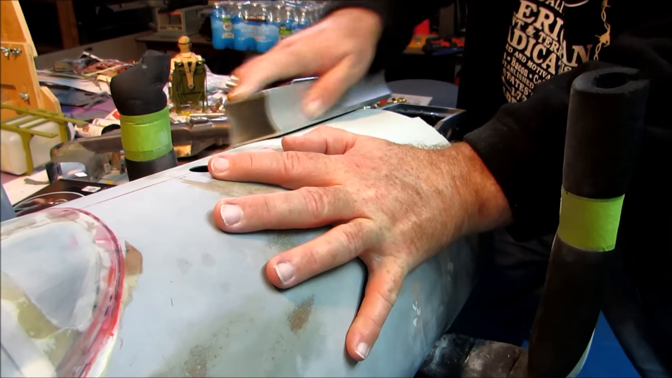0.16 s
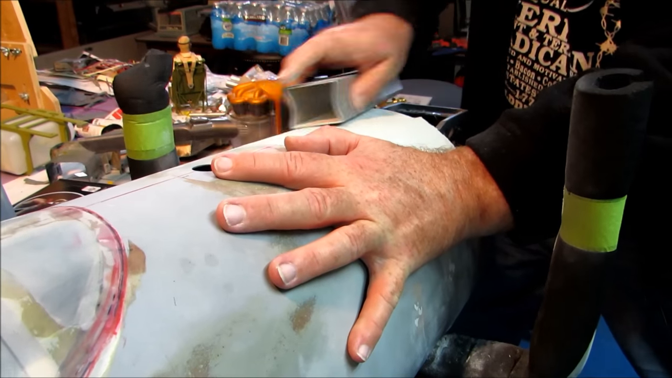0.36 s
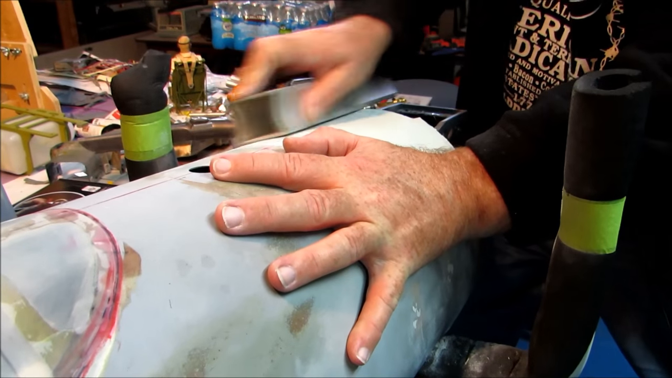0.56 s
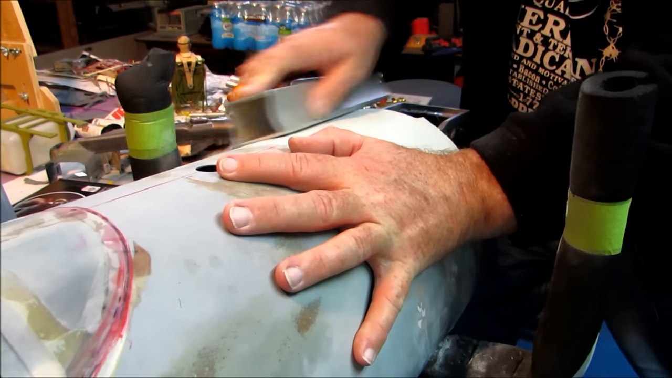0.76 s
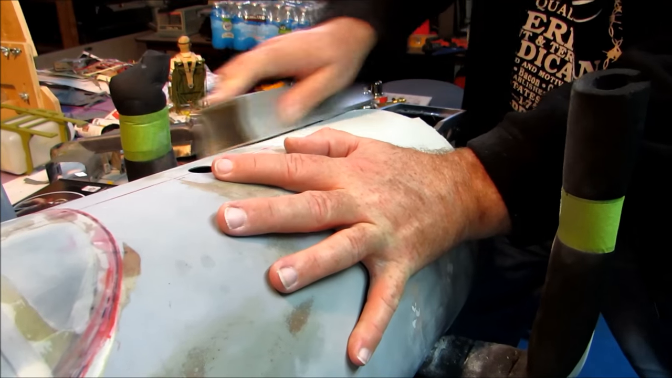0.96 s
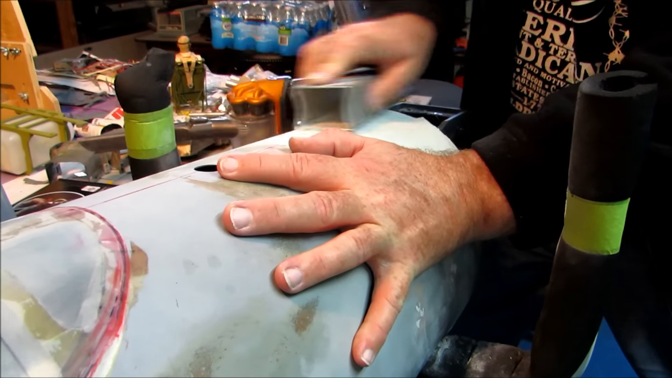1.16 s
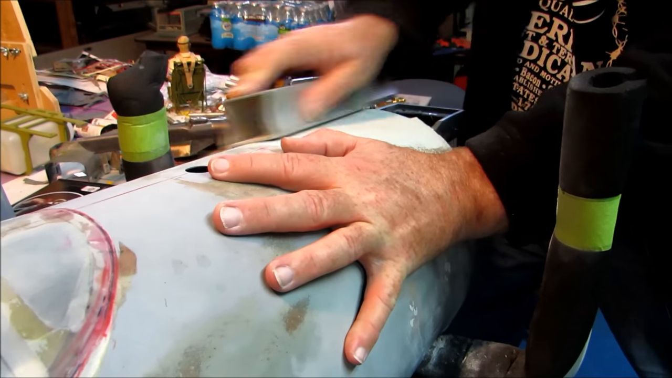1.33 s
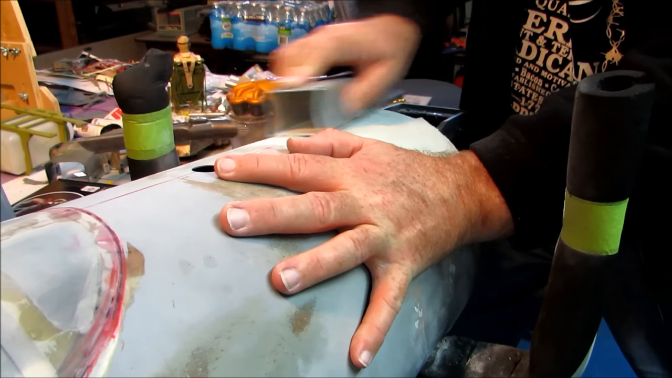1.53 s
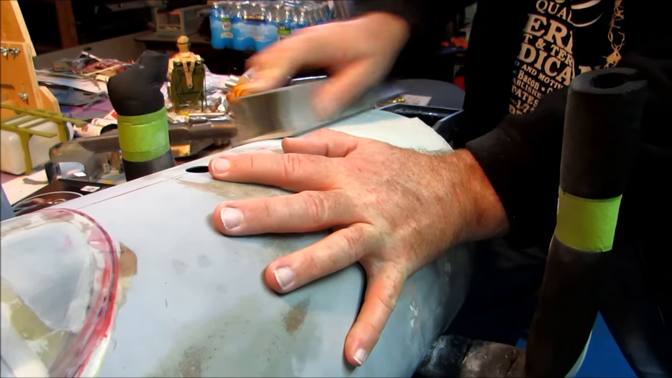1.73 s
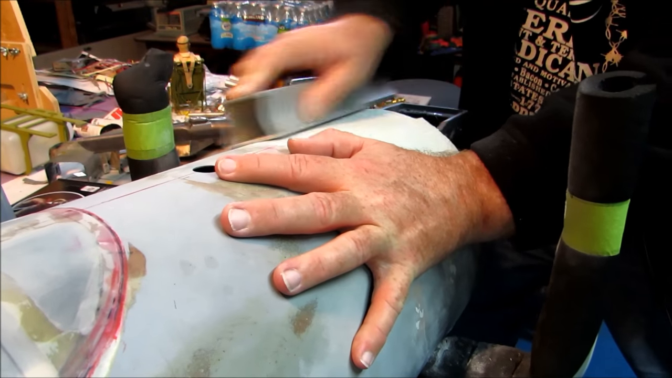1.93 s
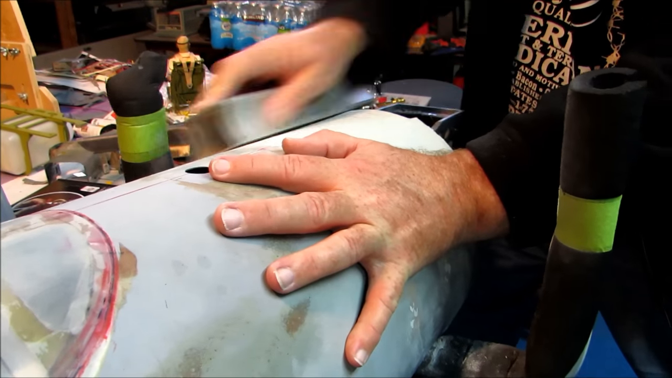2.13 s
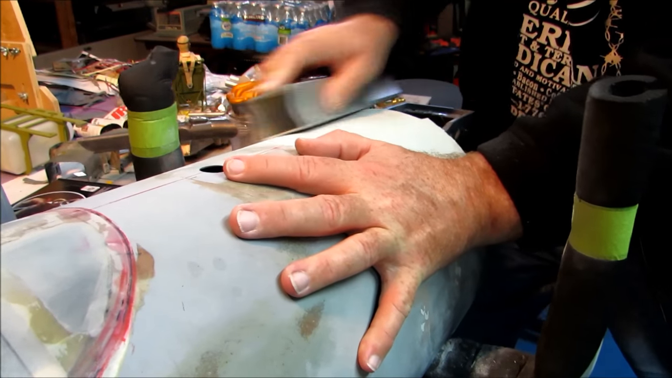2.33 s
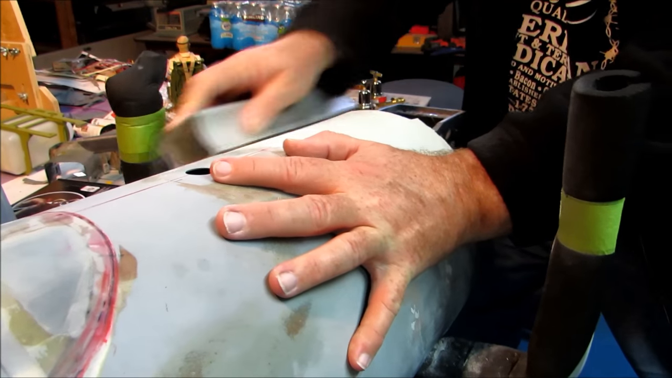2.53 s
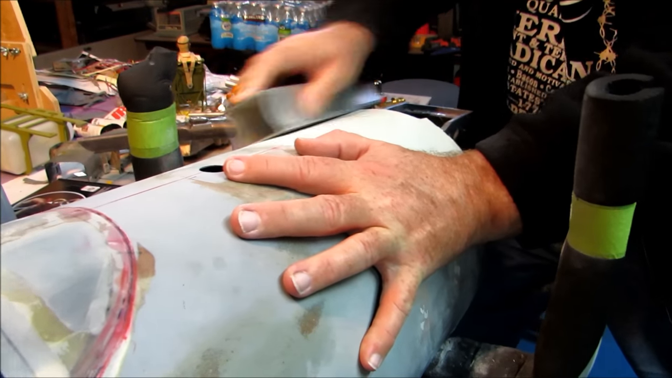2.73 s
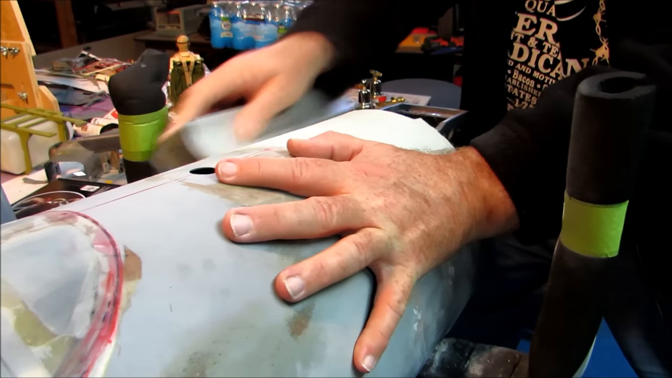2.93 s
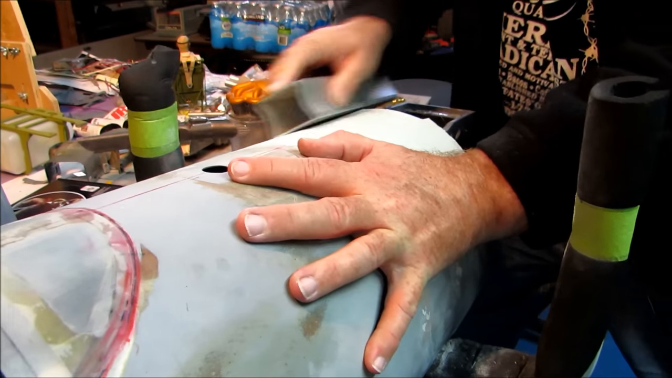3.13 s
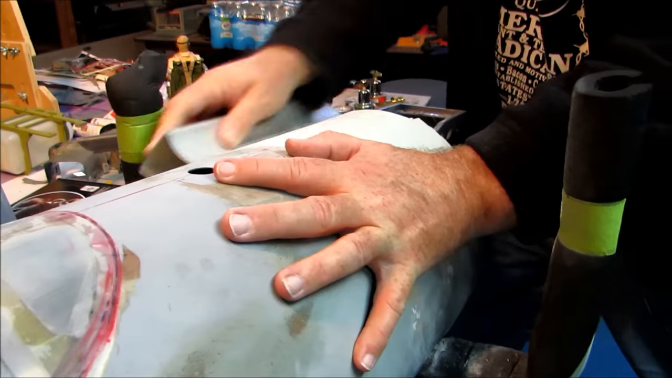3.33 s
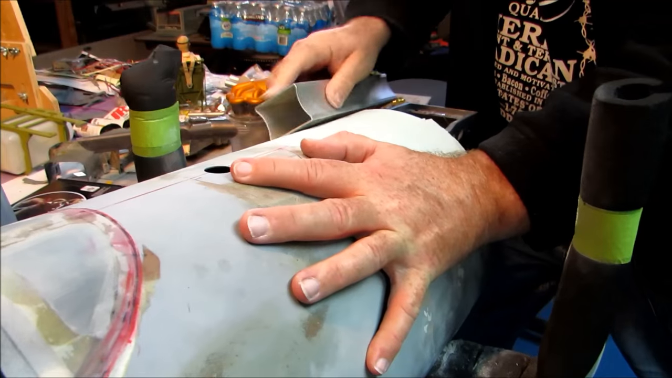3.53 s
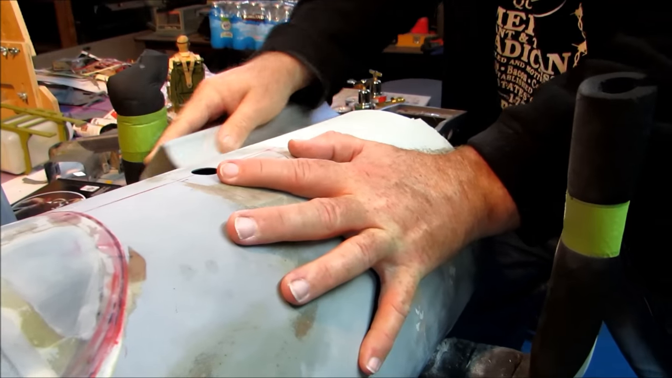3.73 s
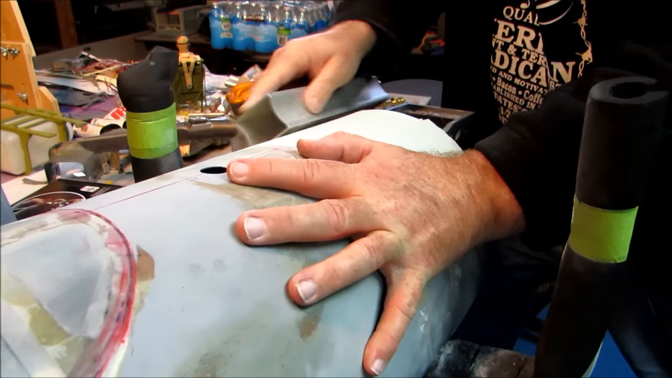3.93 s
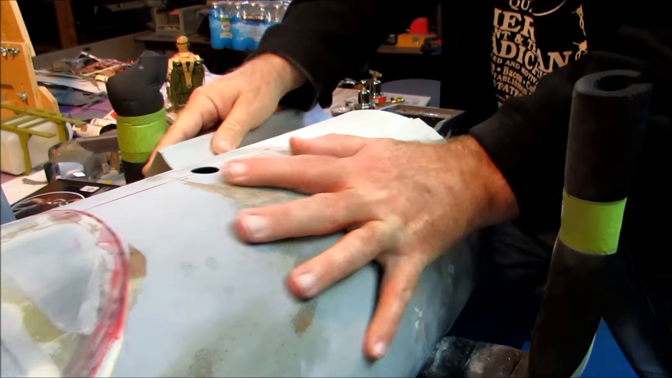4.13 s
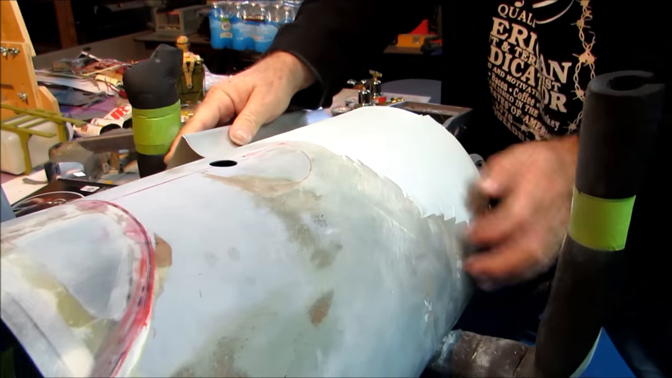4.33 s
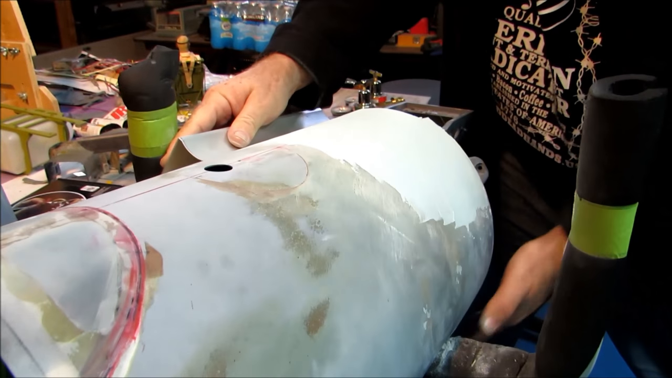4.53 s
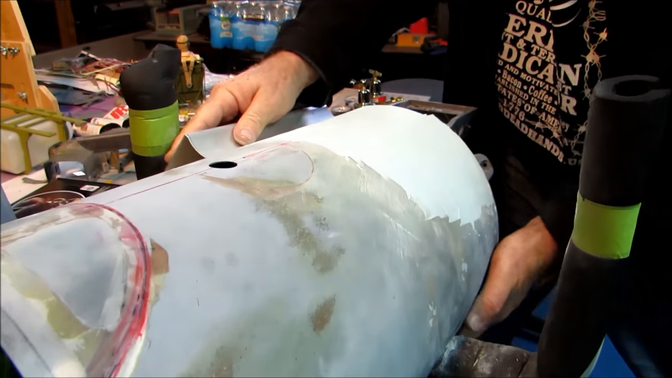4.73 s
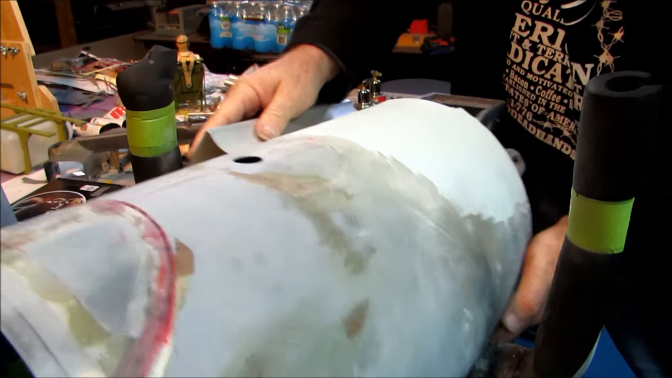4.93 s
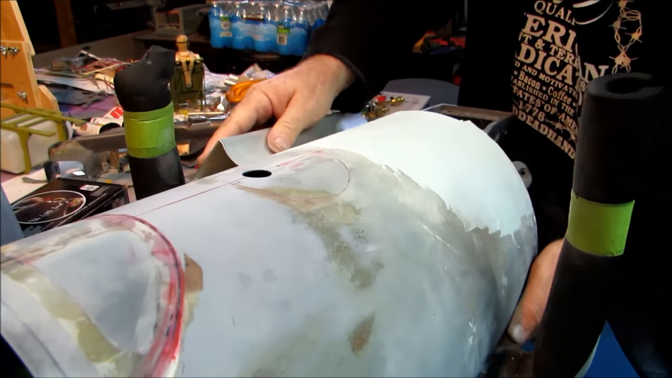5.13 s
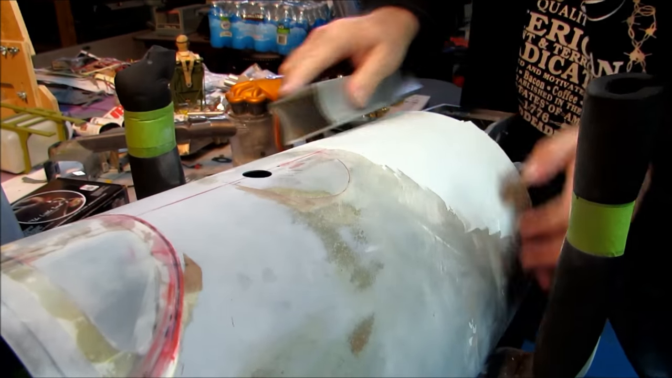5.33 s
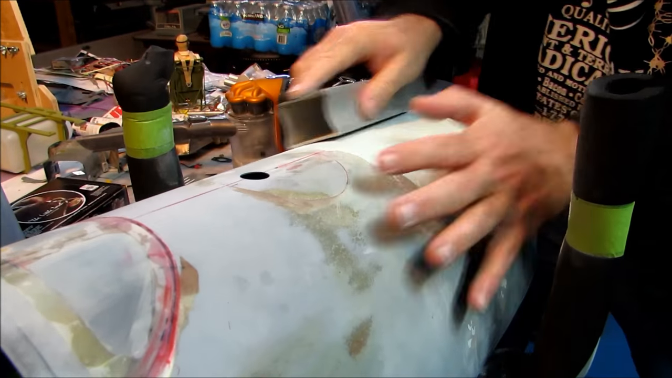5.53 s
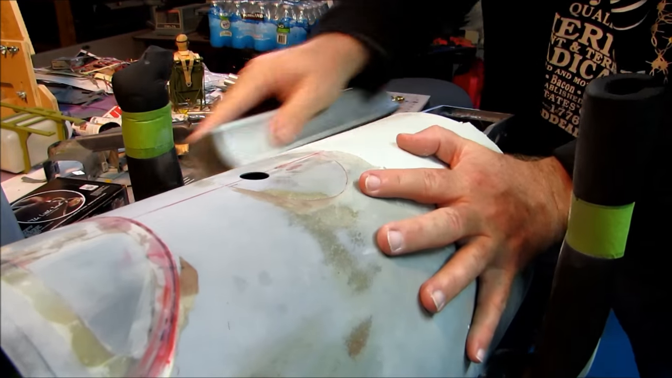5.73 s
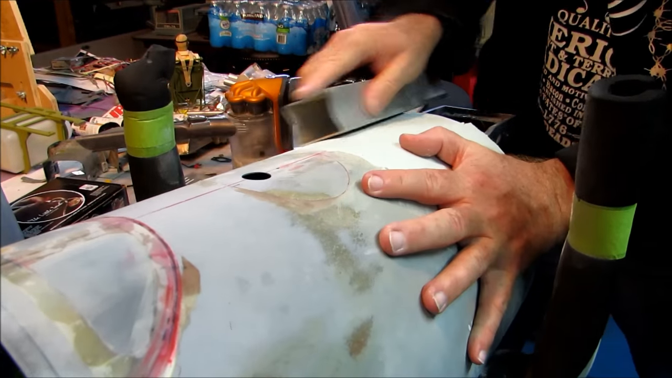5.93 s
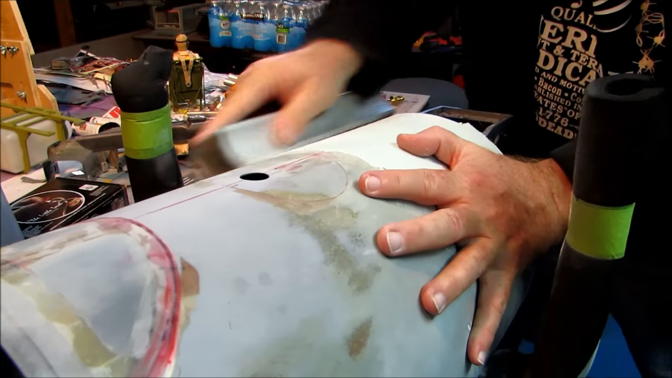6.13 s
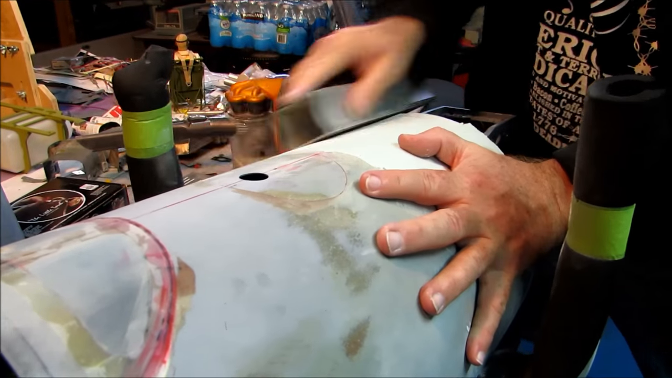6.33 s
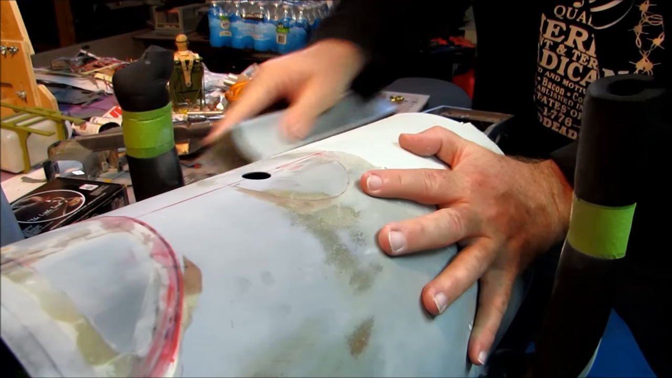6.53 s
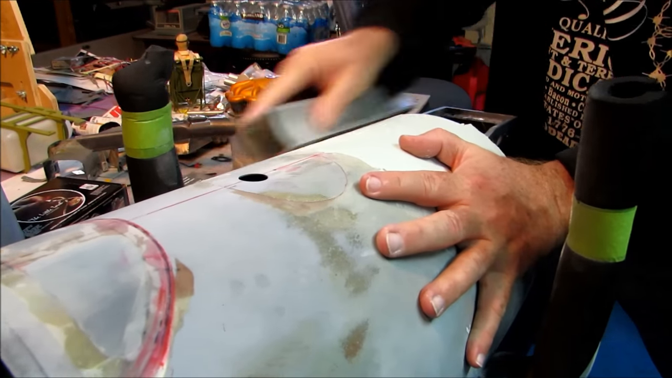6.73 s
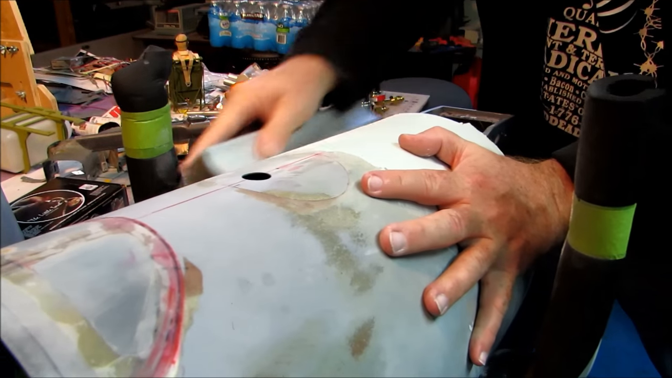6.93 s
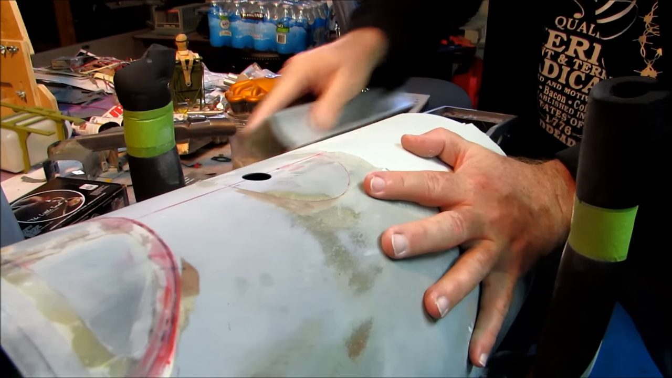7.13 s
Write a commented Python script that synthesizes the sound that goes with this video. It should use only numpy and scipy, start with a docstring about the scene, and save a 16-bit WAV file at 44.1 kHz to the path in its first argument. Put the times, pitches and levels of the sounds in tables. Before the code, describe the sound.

Close and toward the right, sandpaper on a block rubs in quick, even strokes across a hollow model airplane body, with a bright hiss, a gritty rasp and small jolts on high spots. The strokes break off briefly as a palm brushes and bumps the shell, ending in a hollow knock, and then carry on at the same pace. The small workshop adds short echoes and a faint fan-like drone.

```python
"""A sanding block runs to and fro, five strokes a second, over filler on a hollow model fuselage.
Each stroke sets off, glides and brakes; the grit hisses and rasps with that speed and the shell drums.
On high spots the block catches, jolts the shell and chatters. In a pause the hands slide and knock on
the shell. A small workshop adds short echoes and a faint drone."""
import sys
import numpy as np
from scipy import signal
from scipy.fft import rfft, irfft, next_fast_len
from scipy.io import wavfile
from scipy.ndimage import uniform_filter1d

SR = 44100
rng = np.random.default_rng(int(sys.argv[2]) if len(sys.argv) > 2 else 0)


def wrap_up_sound(samples):
    """Save the sound to the file named by the first command line argument, as 16-bit audio."""
    columns = np.atleast_2d(samples).T
    # keep every value between -1 and 1, then stretch to whole-number steps
    tamed = np.clip(columns, -1, 1)
    steps = np.round(tamed * 32767).astype(np.int16)
    wavfile.write(sys.argv[1], SR, steps)


N = 320607
TIME_S = np.arange(N) / SR
FFT_SIZE = next_fast_len(N + SR // 2)
FREQ_HZ = np.fft.rfftfreq(FFT_SIZE, 1 / SR)

# pull and push in turn, pull first (start [s], pressure [dB], extra hiss [dB], attack [s])
STROKES = [(-0.077, -23.5, 1.5, 0.03), (0.083, -24.5, -2.2, 0.042), (0.29, -24, 1, 0.047),
           (0.482, -21.5, 1.7, 0.032), (0.713, -23, 3, 0.051), (0.895, -21.5, 2.5, 0.034),
           (1.086, -22.5, 0.5, 0.024), (1.278, -22, -0.4, 0.022), (1.495, -22.1, -1, 0.01),
           (1.674, -22.5, 2, 0.025), (1.89, -20, -1.6, 0.015), (2.066, -19, -0.5, 0.033),
           (2.274, -21.2, -0.5, 0.014), (2.458, -19.5, 0.5, 0.035), (2.66, -23, 0.2, 0.026),
           (2.848, -20, 1.5, 0.036), (3.033, -22.5, 1, 0.035), (3.23, -21.5, 2.6, 0.038),
           (3.422, -21.5, 0, 0.03), (3.605, -23.5, 4, 0.027), (3.793, -23, -0.8, 0.021),
           (3.963, -21, 1.9, 0.047), (4.147, -37, -20, 0.023), (5.538, -19, 0.9, 0.062),
           (5.771, -21, 2.2, 0.018), (5.944, -21, 5.5, 0.044), (6.138, -22.5, 2.5, 0.022),
           (6.321, -19.5, 4.5, 0.067), (6.532, -21.5, 2.5, 0.029), (6.728, -21.5, 3.5, 0.026),
           (6.926, -22.5, 1.1, 0.029), (7.122, -25, 3, 0.036)]
# block comes to rest (time [s])
STOPS = [4.31, 7.34]
# block grazes without pressure (centre [s], half length [s], rasp [dB], hiss [dB])
GRAZES = [(4.219, 0.0091, -31, -34.5), (4.256, 0.018, -53, -52), (4.365, 0.013, -51, -46),
          (5.195, 0.02, -48.5, -54), (5.226, 0.006, -37, -72)]
# block catches on a high spot (centre [s], half length [s], chatter [Hz], force [dB])
CATCHES = [(0.387, 0.017, 262, -28), (0.651, 0.011, 257.6, -26), (0.782, 0.019, 297, -24),
           (1.046, 0.016, 813, -26), (1.137, 0.024, 269, -23), (1.43, 0.024, 785, -25.5),
           (1.553, 0.012, 270, -21), (1.822, 0.034, 766, -23.5), (2.2, 0.026, 1044, -31.5),
           (3.756, 0.0085, 619, -22.5), (3.875, .018, 250, -29.5), (4.102, 0.015, 440, -21),
           (5.14, 0.041, 262, -50), (5.703, 0.017, 820, -28.5), (5.92, 0.011, 281, -29.5),
           (5.993, 0.0069, 300, -27.5), (6.882, 0.015, 800, -27), (6.964, 0.011, 398, -23.5),
           (7.249, 0.017, 940, -25.5)]
# shell drumming for a given pressure (time [s], gain [dB])
DRUM_GAIN = [(0, -7.5), (1.0, -12), (2.5, -14), (3.5, -14), (4.0, -12.5), (4.3, 3), (5.6, -14),
             (6.2, -16.5), (7.27, -14)]
# shell modes under the block (frequency [Hz], width [Hz], gain [dB])
SHELL_MODES = [(97, 18, -15), (169.3, 10.2, 2.5), (245, 20.3, 3.5), (283, 40, 0.5), (370.5, 43, -2.5),
               (431, 15, -1), (526, 14, -3.5), (693, 26, -5)]
# noise spectra (frequency [Hz], relative density [dB])
HISS_SPECTRUM = [(200, -27), (1500, -49), (3200, 1), (4700, -2), (5600, -2.5), (7000, 1), (8500, -1),
                 (11500, -1.5), (13000, -2.5), (14300, -11), (15200, -40)]
RASP_SPECTRUM = [(40, -31), (85, -21), (200, -19), (450, -2.5), (620, -4.5), (780, -3), (1050, 1),
                 (1280, -2.5), (1650, 0), (2600, 0), (3200, -7), (4600, -7.5), (8000, -16.5), (15000, -38)]
DRONE_SPECTRUM = [(15, -44), (25, -14), (250, -5), (404, -8), (529, 0), (790, -9), (1060, -4), (1390, -11),
                  (1500, -10), (1960, -15), (3440, -17), (4040, -25), (4620, -21), (10300, -28),
                  (15000, -36)]
CLACK_SPECTRUM = [(30, -30), (100, -3), (250, -6), (900, 2), (2000, -3.5), (3300, -7), (5000, -17.5),
                  (9000, -26), (15000, -37)]
PALM_SPECTRUM = [(100, -31), (270, -7), (550, -10), (850, -11), (1120, -2), (1350, -6), (1630, -4),
                 (2100, -12), (3200, -13.5), (5000, -21.5), (10000, -26), (15000, -34)]
# peaks in the drone (frequency [Hz], width [Hz], level [dB])
DRONE_PEAKS = [(550, 17, -74), (1080, 55, -78)]
# hand and block hit the shell (time [s], boom [dB], hardness [dB/octave], clack [dB], clack t60 [s])
KNOCKS = [(1.509, -26, 1, -17, 0.073), (4.207, -30, 10, -24, 0.26), (4.66, -38, -6, -38.5, 0.17),
          (5.197, -43, -5, -35, 0.15), (5.420, -39, -8, -29.5, 0.62), (5.468, -14.5, -0.5, -30, 0.058),
          (6.944, -42, 3, -21.5, 0.048), (7.137, -50, 5, -28, .08)]
# modes of the knocked shell (frequency [Hz], gain [dB], t60 [s])
KNOCK_MODES = [(164.5, -17, 0.23), (276, -9, 0.23), (338, -17, 0.49), (532, 1.5, 0.11), (770, -20, 0.34),
               (1103, -16, 0.23), (1335, -27, 0.46), (1420, -25, 0.34), (1560, -16.5, 0.16)]
# palm slides on the shell (centre [s], half length [s], level [dB])
SLIDES = [(4.76, 0.022, -45.5), (4.865, 0.045, -42), (5.226, 0.018, -35)]
# stereo balance (frequency [Hz], left minus right [dB])
BALANCE = [(100, 0), (170, -1), (245, 1.5), (350, 0), (480, -4), (610, -14.5), (760, -6.5), (980, -4),
           (1500, -7), (2400, -14), (3500, -7), (7300, -8), (8500, -14), (13000, -22.5)]
# likeness of left and right (frequency [Hz], coherence [0-1])
COHERENCE = [(60, 0.3), (160, 1), (500, 0.64), (610, 0.47), (760, 0.68), (1100, 1), (1350, 0.37),
             (1600, 0.91), (3000, 0.17), (4600, 0.37), (9000, 0.2), (13000, 0.42)]
# phase between the sides (frequency [Hz], left lead [rad])
LEFT_LEAD = [(0, 0), (250, -.1), (560, -2.4), (700, .6), (1300, -2.6), (1500, -.9), (2300, -2.8),
             (4650, -5.3), (10400, -11.8), (15000, -17)]
# narrow output dips (frequency [Hz], width [Hz], depth [0-1])
NOTCHES = [(3963, 230, 0.82), (7940, 140, .92)]


def amp(db):
    """Decibels to gain."""
    return 10 ** (np.asarray(db) / 20)


def unit_rms(x):
    """Scale to rms 1."""
    return x / np.sqrt(np.mean(x ** 2) + 1e-20)


def curve(table):
    """Interpolate a table over log frequency."""
    hz, value = np.transpose(table)
    return np.interp(np.log(FREQ_HZ + 1), np.log(hz + 1), value)


def filtered(x, response):
    """Apply a frequency response."""
    return irfft(rfft(x, FFT_SIZE) * response, FFT_SIZE)[..., :N]


def coloured(x, response):
    """Colour a white signal at constant power."""
    return filtered(x, response / np.sqrt(np.mean(abs(response) ** 2)))


def resonance(hz, width_hz):
    """Response of one damped mode."""
    damping = 1j * FREQ_HZ * width_hz
    return damping / (hz ** 2 - FREQ_HZ ** 2 + damping)


def swell(centre_s, half_s):
    """Bell-shaped envelope."""
    return np.exp(-.5 * np.minimum(((TIME_S - centre_s) / half_s) ** 2, 100))


def judder(rate_hz, depth_db):
    """Gain of a contact that grips and slips at random."""
    wobble = filtered(rng.standard_normal(N), 1 / (1 + (FREQ_HZ / rate_hz) ** 2))
    return unit_rms(amp(depth_db * unit_rms(wobble)))


def grit(snaps_per_s, spread_db, snap_share):
    """Uneven grains snap free in a wash of countless small ones."""
    snaps = (rng.random((2, N)) < snaps_per_s / SR) * rng.choice([-1, 1], (2, N))
    snaps = snaps * amp(spread_db * np.minimum(rng.exponential(1, N), 4))
    wash = rng.standard_normal((2, N))
    return np.sqrt(snap_share) * unit_rms(snaps) + np.sqrt(1 - snap_share) * wash


def wandering(x, narrow_db, broad_db):
    """The moving contact favours changing resonances, narrow and broad."""
    spectra = signal.stft(x, nperseg=1024, noverlap=768)[2]
    gain_db = 0
    for depth_db, bins, frames in (narrow_db, 3, 7), (broad_db, 12, 9):
        ripple = uniform_filter1d(rng.standard_normal(spectra.shape[1:]), bins, axis=0)
        ripple = unit_rms(uniform_filter1d(ripple, frames, axis=1))
        gain_db += depth_db * np.clip(ripple, -2, 2)
    return signal.istft(spectra * unit_rms(amp(gain_db)), nperseg=1024, noverlap=768)[1][:, :N]


def stroke_envelopes(pull_brake_s=0.027, push_brake_s=0.035, hold_s=0.023, sideways=0.15):
    """Hiss, rasp and drum follow hand pressure and powers of speed; grazes add hiss and rasp."""
    speed, spurt, pressure, bite = np.zeros((4, N))
    turns_s = np.sort([row[0] for row in STROKES] + list(STOPS))
    for k, (start_s, pressure_db, bite_db, attack_s) in enumerate(STROKES):
        end_s = turns_s[turns_s > start_s][0]
        now = (TIME_S >= start_s) & (TIME_S < end_s)
        age_s = TIME_S[now] - start_s
        brake_s = push_brake_s if k % 2 else pull_brake_s
        along = np.tanh(age_s / attack_s) * np.tanh((end_s - TIME_S[now]) / brake_s)
        speed[now] = np.hypot(along, sideways) / np.hypot(1, sideways)  # drifts on through a turn
        breakaway = 0.069 * np.tanh(hold_s / attack_s)  # grit holds, then tears free
        spurt[now] = breakaway * (age_s > hold_s) * np.exp((hold_s - age_s) / attack_s)
        pressure[now], bite[now] = amp(pressure_db), amp(bite_db)
    hiss = pressure * bite * (speed ** 3.7 + spurt)
    rasp = pressure * speed ** 1.24
    drum = pressure * amp(np.interp(TIME_S, *np.transpose(DRUM_GAIN))) * speed ** 0.57
    for centre_s, half_s, rasp_db, hiss_db in GRAZES:
        rasp += amp(rasp_db) * swell(centre_s, half_s)
        hiss += amp(hiss_db) * swell(centre_s, half_s)
    return hiss, rasp, drum


def catch_envelope(db_per_octave=0):
    """Force swells at the catches, weighted by chatter frequency."""
    return sum(amp(force_db + db_per_octave * np.log2(hz / 500)) * swell(centre_s, half_s)
               for centre_s, half_s, hz, force_db in CATCHES)


def grit_hiss(envelope, gain_db=-0.5):
    """Fine grit hisses straight into the air."""
    grains = grit(snaps_per_s=3000, spread_db=4.0, snap_share=0.37)
    grains = wandering(grains, narrow_db=3.0, broad_db=1.53)
    return amp(gain_db) * coloured(grains * envelope, amp(curve(HISS_SPECTRUM)))


def grit_rasp(envelope, grip, catch_gain_db=2.5):
    """Coarse grit rasps through the block; catches add more, the quicker their chatter."""
    grains = grit(snaps_per_s=1500, spread_db=2.5, snap_share=0.21)
    grains = wandering(grains, narrow_db=2.0, broad_db=1.04)
    catches = amp(catch_gain_db) * catch_envelope(db_per_octave=6.5)
    force = np.hypot(envelope, catches) * grip * judder(rate_hz=48, depth_db=1.11)
    return coloured(grains * force, amp(curve(RASP_SPECTRUM)))


def shell_response(low_hz=50, high_hz=1500):
    """Modes of a small hollow shell, which radiates little deep bass."""
    modes = sum(amp(db) * resonance(hz, width_hz) * (-1) ** k
                for k, (hz, width_hz, db) in enumerate(SHELL_MODES))
    return modes / np.sqrt((1 + (low_hz / (FREQ_HZ + 1)) ** 4) * (1 + (FREQ_HZ / high_hz) ** 2))


def shell_drum(envelope, gain_db=-0.53):
    """Grit on lumpy filler drives the shell modes."""
    lumps = judder(rate_hz=7.1, depth_db=2.0)
    grains = grit(snaps_per_s=490, spread_db=1.5, snap_share=0.28)
    grains = wandering(grains, narrow_db=2.0, broad_db=0.4)
    return amp(gain_db) * coloured(grains * envelope * lumps, shell_response())


def drone(floor_db=-50.5, common_gain=0.14):
    """Steady room noise with two soft peaks, as of a far fan."""
    noise = unit_rms(rng.standard_normal((2, N)) + common_gain * rng.standard_normal(N))
    peaks = sum(amp(db) * coloured(noise, resonance(hz, width_hz)) for hz, width_hz, db in DRONE_PEAKS)
    return amp(floor_db) * coloured(noise, amp(curve(DRONE_SPECTRUM))) + peaks


def catch_jolts(gain_db=-1.0, low_hz=290):
    """A sharp catch jolts the shell, favouring its higher modes."""
    upper_modes = shell_response() / np.sqrt(1 + (low_hz / (FREQ_HZ + 1)) ** 4)
    return amp(gain_db) * coloured(rng.standard_normal((2, N)) * catch_envelope(), upper_modes)


def catch_chatter(pitch_jitter=0.1, db_per_octave=1.5):
    """The caught block sticks and slips unevenly at one shell resonance."""
    detune = pitch_jitter * unit_rms(uniform_filter1d(rng.standard_normal(N), size=150))
    warped_s = TIME_S + np.cumsum(detune) / SR
    tones = np.zeros(N)
    for centre_s, half_s, hz, force_db in CATCHES:
        envelope = amp(force_db + db_per_octave * np.log2(hz / 500)) * swell(centre_s, half_s)
        tones += envelope * np.sin(2 * np.pi * hz * warped_s)
    return tones * np.array([[1], [.3]])


def knocks(tick_db=-21, tick_s=0.00063, low_hz=130, thud_db=-7, thud_t60_s=0.16):
    """Each knock rings the shell, with a dull thud, a tick and a short clack of the block."""
    boom, thud, clack, tick = np.zeros((4, N))
    for start_s, boom_db, hardness, clack_db, clack_t60_s in KNOCKS:
        now = (TIME_S >= start_s) & (TIME_S < start_s + 1)
        age_s = TIME_S[now] - start_s
        for hz, db, t60_s in KNOCK_MODES:
            mode_db = boom_db + db + hardness * np.log2(hz / 500)  # soft touch: mostly low modes
            boom[now] += amp(mode_db - 60 * age_s / t60_s) * np.sin(2 * np.pi * hz * age_s)
        thud[now] += amp(boom_db + thud_db - 60 * age_s / thud_t60_s)
        clack[now] += amp(clack_db - 60 * age_s / clack_t60_s)
        tick[now] += amp(boom_db + tick_db) * np.exp(-age_s / tick_s)
    boom = signal.sosfilt(signal.butter(3, low_hz, "high", fs=SR, output="sos"), boom)
    block_noise, hand_noise = rng.standard_normal((2, 2, N))
    thuds = coloured(hand_noise * thud, resonance(hz=380, width_hz=260) / (1 + 1j * FREQ_HZ / 900))
    clacks = coloured(block_noise * clack, amp(curve(CLACK_SPECTRUM)))
    return boom * np.array([[1], [.5]]) + thuds + clacks + block_noise * tick


def palm_slides():
    """Skin brushes the shell as the steadying hand finds a new grip."""
    envelope = sum(amp(db) * swell(centre_s, half_s) for centre_s, half_s, db in SLIDES)
    friction = rng.standard_normal((2, N)) * judder(rate_hz=36, depth_db=0.5)
    return coloured(friction * envelope, amp(curve(PALM_SPECTRUM)))


def place_right(x):
    """The work lies to the right: that side hears it sooner and brighter."""
    coherence = np.clip(curve(COHERENCE), 0, .98)
    balance = amp(curve(BALANCE))
    lead = np.exp(1j * np.interp(FREQ_HZ, *np.transpose(LEFT_LEAD)))
    equal_power = np.sqrt(2 / (1 + balance ** 2))
    left = filtered(x[0], coherence * lead) + filtered(x[1], np.sqrt(1 - coherence ** 2))
    return np.array([filtered(left, equal_power * balance), filtered(x[0], equal_power)])


def workshop(x, wet_db=-8.0, t60_s=0.27, high_hz=12000, echoes_per_s=2000, gap_s=0.002):
    """Bench, clutter and walls return a short scatter of echoes."""
    delay_s = TIME_S[:SR // 3]
    taps = rng.standard_normal((2, len(delay_s)))
    taps *= rng.random(taps.shape) < echoes_per_s / SR
    taps *= (delay_s > gap_s) * amp(-60 * delay_s / t60_s)
    taps /= np.linalg.norm(taps, axis=1, keepdims=True)
    return x + amp(wet_db) * filtered(x, rfft(taps, FFT_SIZE) / (1 + 1j * FREQ_HZ / high_hz))


def scene():
    """Sanding, catches and handling in the room, over the drone."""
    hiss, rasp, drum = stroke_envelopes()
    grip = judder(rate_hz=87, depth_db=0.36)
    sanding = grit_hiss(hiss * grip) + grit_rasp(rasp, grip) + shell_drum(drum)
    catches = catch_jolts() + catch_chatter()
    handling = palm_slides() + knocks()
    return workshop(place_right(sanding + catches + handling)) + drone()


def record(dry, ceiling=0.85, cutoff_hz=15150):
    """Soft clip, two narrow notches, low-pass."""
    rounded = dry / (1 + (dry / ceiling) ** 6) ** (1 / 6)
    notches = np.prod([1 - depth / (1 + (2 * (FREQ_HZ - hz) / width_hz) ** 2)
                       for hz, width_hz, depth in NOTCHES], axis=0)
    low_pass = signal.firwin(511, cutoff_hz, window=("kaiser", 9), fs=SR)
    return signal.oaconvolve(filtered(rounded, notches), low_pass[None], "same")


dry = scene()
out = record(dry)
wrap_up_sound(out)
```